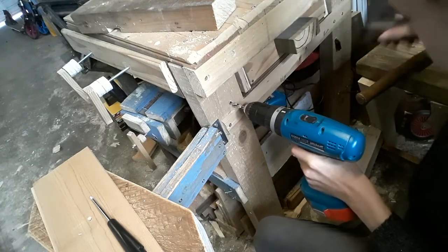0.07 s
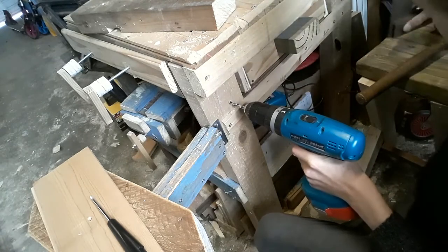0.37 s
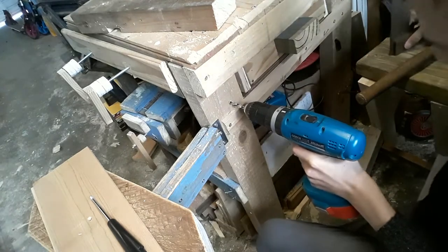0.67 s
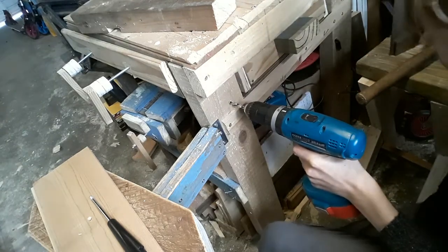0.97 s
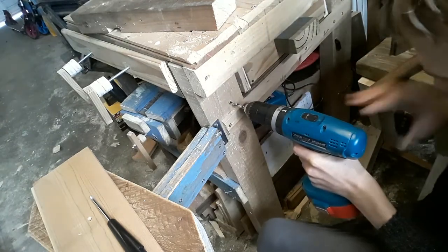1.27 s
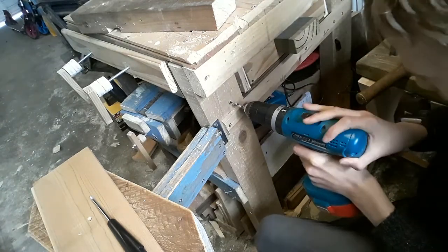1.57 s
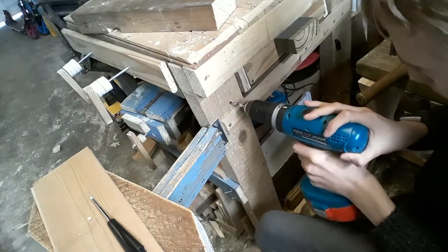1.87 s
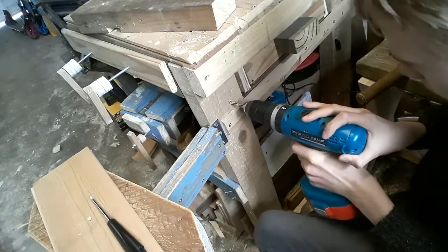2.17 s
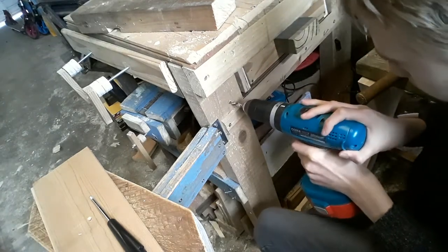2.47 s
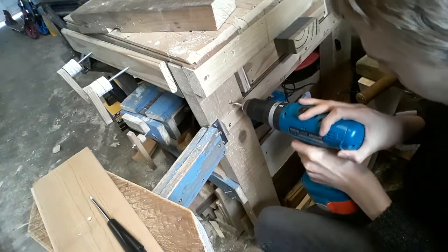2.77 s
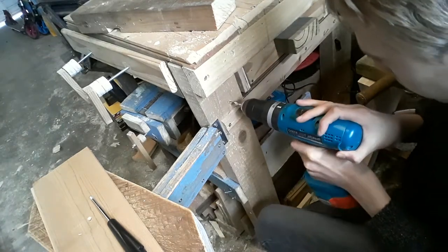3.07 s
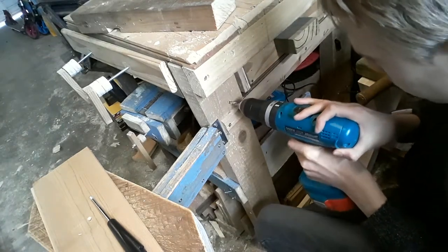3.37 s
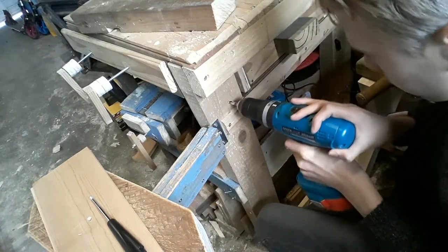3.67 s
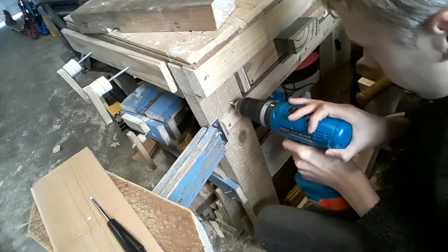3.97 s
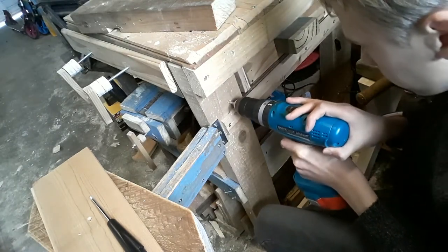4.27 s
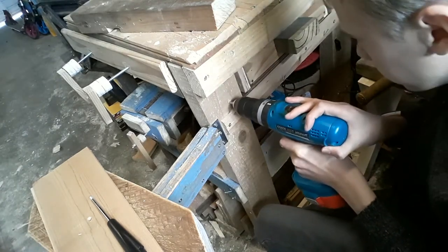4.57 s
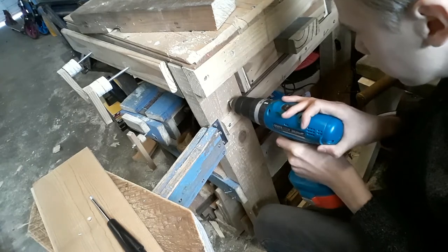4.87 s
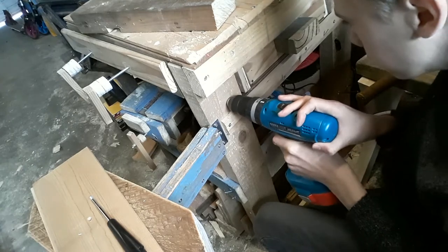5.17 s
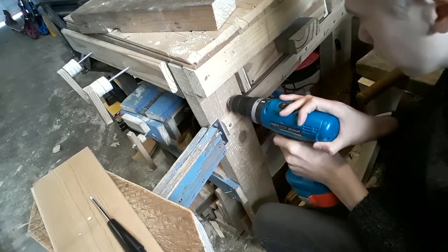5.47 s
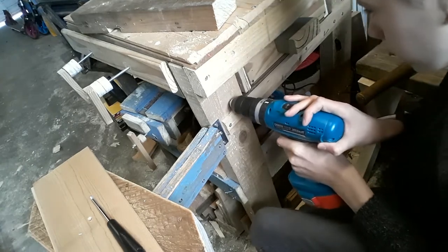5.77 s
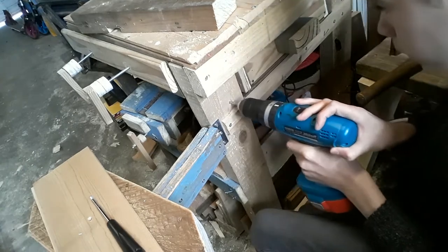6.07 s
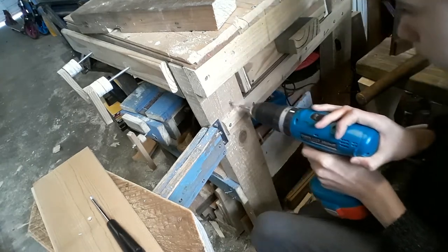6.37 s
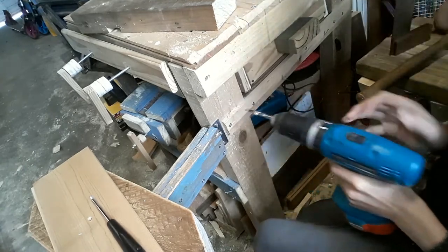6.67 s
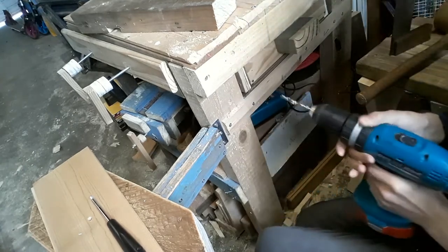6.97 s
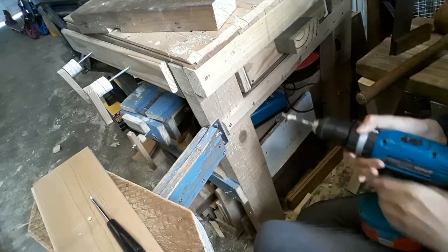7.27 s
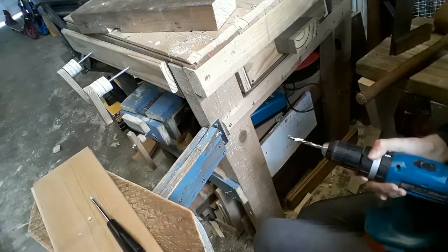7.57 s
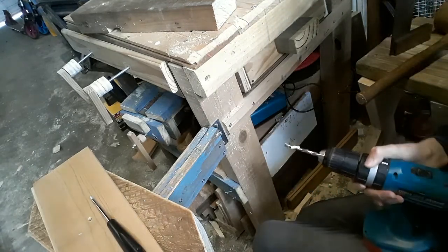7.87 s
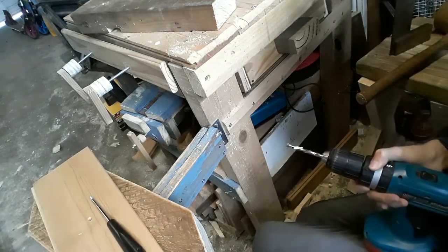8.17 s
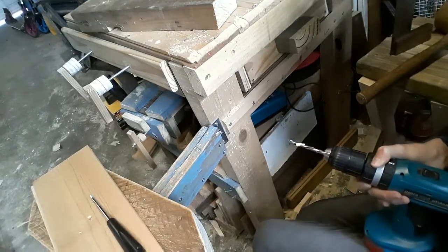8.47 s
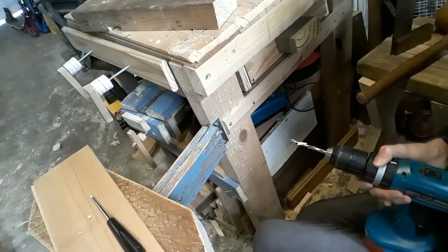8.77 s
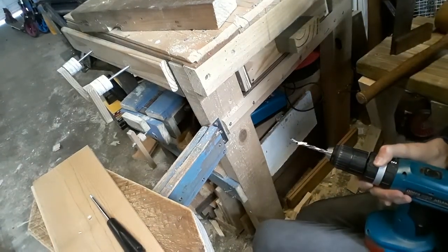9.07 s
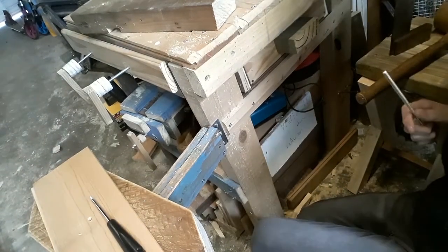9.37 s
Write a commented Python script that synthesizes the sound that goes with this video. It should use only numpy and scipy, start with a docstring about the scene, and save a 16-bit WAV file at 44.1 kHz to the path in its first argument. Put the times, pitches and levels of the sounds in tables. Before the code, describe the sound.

After a wooden knock, a cordless drill grinds into a workbench leg with a rising whine, stops, then whirs once briefly.

```python
"""A cordless drill bores into the wooden leg of a workbench in a small workshop: a slow start, a long run that
labours and then frees up, and one short burst with the bit pulled out. Motor speed drives the sound: gear teeth
rattle the housing, the rotor whines and, running free, squeals high, and the bit scrapes and splinters the
wood. Before it a piece of wood is put down and rings; hands and sleeves scuff on the tool, and a small bird
whistles outside over a faint bed of air."""
import sys
import numpy as np
from scipy import signal
from scipy.fft import rfft, irfft
from scipy.io import wavfile
from scipy.ndimage import uniform_filter1d

SR = 44100
rng = np.random.default_rng(int(sys.argv[2]) if len(sys.argv) > 2 else 0)


def generate_wav(sig):
    """Save sig (samples, or channels by samples) to the path in sys.argv[1] as 16-bit PCM at SR."""
    pcm = np.round(np.clip(np.atleast_2d(sig).T, -1, 1) * 32767).astype(np.int16)
    wavfile.write(sys.argv[1], SR, pcm)


N = 419832
TIME = np.arange(N) / SR

# motor speed through the hole; the trigger is let go at the last point: (time [s], speed [turns/s])
MOTOR_SPEED = [(1.83, 22), (1.95, 66), (2.0, 115), (2.16, 95), (2.25, 168), (2.7, 173), (2.89, 120),
               (3.02, 232), (3.2, 252), (3.45, 224), (3.85, 268), (4.14, 236), (4.28, 262), (4.38, 386),
               (4.55, 370), (4.69, 394), (4.81, 362), (5.02, 426), (5.38, 384), (5.55, 398), (5.75, 466),
               (6.05, 500), (6.4, 522), (6.545, 518)]
# how hard the drill is pushed into the wood: (time [s], gain [dB])
PUSH = [(2.05, 6), (2.35, -4.5), (3.05, -1), (3.5, 1), (3.8, 0.5), (4.82, 1.5), (4.92, -2.5), (5.4, -2.5),
        (5.58, -3.5), (5.8, 4), (6.05, 2.5), (6.4, -9)]
# EQ of the running drill and of its top-end sizzle: (frequency [Hz], gain [dB])
DRILL_EQ = [(90, -26), (150, -14.5), (200, -18), (250, -7.5), (320, -10.5), (420, -4), (600, -5), (780, -2),
            (1250, 0.5), (1600, 4), (2700, 1.5), (3400, -2.5), (4000, 1), (5200, 0), (7000, -2.5),
            (7700, -1.5), (8900, -9)]
SIZZLE_EQ = [(7800, -19.5), (8800, -12), (10000, -11), (11300, -6.5), (12700, -1), (14200, -8.5),
             (15500, -5.5)]
# resonances of the drill's housing: (frequency [Hz], width [Hz], gain [dB])
HOUSING_MODES = [(1557, 45, 1.5), (1745, 27, -5.5), (1941, 32, 6), (2110, 110, 4), (2260, 50, 1.5),
                 (2333, 50, 5.5), (2622, 97, 3), (2786, 13, 7.5), (3066, 62, -4.5), (3910, 160, -8),
                 (4730, 60, -18.5), (5890, 390, -10.5), (7550, 490, -2.5)]
# how each layer's level rides the motor speed:
# (gain at labouring speed [dB], slope below [dB/doubling], slope above [dB/doubling], added when free [dB])
BODY_RIDE = (-41, 10, 0, -8.5)
RATTLE_RIDE = (-31.5, 10, 0, -1)
CLASH_RIDE = (-33.5, 23.5, 7, -3)
SIZZLE_RIDE = (-42, 29.5, 8.5, -0.5)
SCRAPE_RIDE = (-39.5, 7, 3.5, -7.5)
WHINE_RIDE = (-1, 27.5, -1.5, -6.5)
# motor harmonics that swell as they sweep past resonances of drill and bench: (pitch [x motor speed],
# resonance [Hz], half width [Hz], gain at resonance [dB], pitch jitter [ratio], throb depth [ratio])
WHINE_PARTIALS = [(1, 280, 18, -49.5, 0.019, 0.23), (1, 372, 24, -36.5, .012, .6),
                  (4, 1120, 60, -44, .026, .3), (4, 1560, 158, -31, .01, .38),
                  (4, 1960, 70, -38.5, .008, .2), (8, 2150, 130, -36.5, .008, .2),
                  (8, 3900, 220, -36.5, .009, .2), (9, 2350, 200, -34.5, .006, .2),
                  (10, 1715, 82, -27, .009, .2), (12, 2760, 200, -36.5, .011, .2),
                  (24, 6000, 480, -46.5, .01, 0.15)]
# gear tones that come up as the motor runs free: (pitch [x motor speed], level [dB])
GEAR_TONES = [(.372, -65.5), (1.13, -58), (1.87, -47.5), (5.62, -53.5), (8.3, -43.5), (12.1, -42),
              (15.07, -44)]
# resonances of the bench leg and of the grinding bit: (frequency [Hz], width [Hz], gain [dB])
LEG_MODES = [(332, 37, -14.5), (458, 40, -6.5), (880, 104, -8.5), (1123, 84, 1), (1648, 95, -2.5)]
BIT_MODES = [(1450, 94, -5), (1710, 64, -0.5)]
# splinters tearing off as the bit enters: (time [s], half length [s], level [dB])
SPLINTERS = [(2.29, .035, -52), (2.34, 0.02, -43), (2.51, 0.045, -49), (2.72, 0.046, -53),
             (2.81, .03, -47.5), (3.103, .022, -36), (3.2, .025, -40), (3.46, .025, -39)]
# EQ of their crackle: (frequency [Hz], gain [dB])
SPLINTER_EQ = [(2000, -20), (5000, 0), (7800, -5), (10000, -2), (13000, 1), (15500, 0)]
# envelope of the high squeal as the motor runs free: (time [s], level [dB])
FREE_SQUEAL = [(6.1, -63), (6.2, -31.5), (6.29, -28), (6.52, -33.5), (6.56, -72)]
# chirp of the motor brake: (time [s], pitch [Hz], level [dB])
BRAKE_CHIRP = [(7.105, 2708, -27), (7.11, 2210, -29), (7.114, 1770, -20.5), (7.117, 2400, -20),
               (7.124, 2700, -52)]
# hits of the wood being put down; harder contact is brighter: (time [s], level [dB], low-pass [Hz])
WOOD_HITS = [(0.549, -23, 9000), (.555, -22.5, 9000), (.595, -23, 3000)]
# ring of that piece of wood: (frequency [Hz], level [dB], t60 [s])
WOOD_MODES = [(135, -16, .2), (165, -7.5, 0.27), (210, -19, 0.18), (284, -8, 0.24), (327, -11, 0.35),
              (461, -2, 0.29), (540, 0, 0.16), (588, -2, 0.25), (623, -20, .2), (735, 1, 0.12),
              (805, -21, .19), (810, -9, 0.23), (1103, 3, 0.13), (1160, -21, 0.14), (1460, -16, 0.11),
              (1620, -8, .16)]
# EQ of its thud: (frequency [Hz], gain [dB])
THUD_EQ = [(60, -37), (130, 1), (280, -3), (400, -5), (560, 5), (850, -4.5), (1100, -6), (1300, -19),
           (1570, -12), (1900, -17), (2400, -15), (4800, -29), (8000, -33.5), (15000, -54)]
# small clicks of the drill in the hand: (time [s], level [dB], decay [s])
TICKS = [(1.258, -49, 0.014), (1.511, -51.5, 0.018), (1.762, -49, .01), (8.405, -40, 0.0034)]
# hands and sleeves: (time [s], half length [s], dull rub level [dB], bright swish level [dB])
SCUFFS = [(0, 0.39, -63, -74), (1.384, 0.11, -59.5, -68), (1.69, 0.06, -58, -82), (1.771, 0.058, -57, -66),
          (7.91, .06, -70, -60), (8.283, 0.052, -69, -56.5), (8.457, 0.072, -61.5, -54.5),
          (9.06, 0.076, -75, -67.5), (9.383, 0.074, -82, -67.5), (9.483, 0.046, -57, -50)]
# EQ of tick, rub and swish: (frequency [Hz], gain [dB])
TICK_EQ = [(70, -27), (250, 6), (2000, -3), (5000, -5), (7800, 7), (10000, -4), (15000, -6)]
RUB_EQ = [(80, -12), (170, 1), (450, 8), (1000, 5), (2500, -1.5), (5000, -6), (15000, -63)]
SWISH_EQ = [(1180, -46), (2000, -47), (2680, -9), (3520, -13), (4360, -2), (4880, -4), (8080, 14),
            (9590, 0), (11800, 8.5), (15500, 3)]
# the bird's notes: (time into the song [s], length [s], start pitch [Hz], middle pitch [Hz],
# end pitch [Hz], level [dB], tremor depth [Hz])
BIRD_NOTES = [(0, .09, 6330, 5430, 5270, -68, 150), (0.187, .15, 4690, 4520, 4070, -64.5, 260),
              (0.289, 0.062, 5170, 4980, 5020, -64.5, 40), (0.421, 0.058, 4100, 4540, 3970, -57, 270),
              (0.552, 0.099, 5500, 4990, 4920, -59.5, 80), (0.769, 0.086, 4340, 4170, 3740, -55, 152),
              (0.964, 0.076, 5150, 5170, 5220, -64, 100), (1.097, 0.195, 6250, 5840, 6540, -65.5, 460),
              (1.145, .13, 5690, 5590, 5740, -64, 40), (1.322, 0.042, 4580, 4610, 4180, -57.5, 170),
              (1.425, 0.031, 4900, 4240, 4020, -59, 160), (1.603, .054, 5000, 4740, 4950, -63.5, 30),
              (1.677, .055, 5260, 5470, 5600, -63.5, 90)]
# cues for the song: (time [s], gain [dB])
SONG_CUES = [(.6, 1), (7.405, -2)]
# EQ of the outdoor murmur and the workshop hiss: (frequency [Hz], gain [dB])
MURMUR_EQ = [(15, -54), (25, -21), (75, -5.5), (108, 0), (170, -4.5), (271, -11), (398, -7), (465, -12),
             (917, -15), (1600, -24.5), (2080, -49.5), (3520, -120)]
HISS_EQ = [(1500, -7), (2100, 2), (2700, 4), (3300, -2.5), (4000, 1.5), (5000, -8.5), (6500, -14),
           (7700, -7.5), (9500, -20.5), (11500, -15.5), (13500, -9.5), (15500, -14)]
# envelope of the hiss: (time [s], level [dB])
HISS_LEVEL = [(0, -60.5), (.9, -60.5), (1.6, -61.5), (6.8, -63.5), (8.4, -63), (9.0, -69), (9.5, -63)]

LABOUR_HZ, EASING_HZ, FREE_HZ = 237, 457, 521  # motor speeds: labouring, coming free, running free
BURST_ON_S, BURST_OFF_S, BURST_HZ = 6.904, 7.119, 511  # the burst with the bit out
CRAWL_HZ = MOTOR_SPEED[0][1]
ROOM_T60_S = 0.23


def drill(brake_s=.06):
    """The motor drives gears, whine and scrape; returns the tool in the room and the dry scrape."""
    driven, released, running = motor()
    braked = np.maximum(driven * np.exp(-released / brake_s), CRAWL_HZ)
    speed = braked * (1 + .004 * drift(40))  # wavers with the changing bite of the bit
    tool = running * gearbox(speed, driven) + room(running * whine(speed), ROOM_T60_S, wet_db=-6)
    return tool, running * scrape(driven)


def motor(spin_up_hz_per_s=3400, nearer_db=5, drop_s=.023, run_out_s=.054, run_out_db=-14):
    """The trigger sets the speed asked for, the seconds since release and the drill's envelope."""
    start_s, release_s = MOTOR_SPEED[0][0], MOTOR_SPEED[-1][0]
    burst = TIME >= BURST_ON_S
    spin_up = np.clip(spin_up_hz_per_s * (TIME - BURST_ON_S), CRAWL_HZ, BURST_HZ)
    driven = np.where(burst, spin_up, curve(MOTOR_SPEED))
    released = np.maximum(TIME - np.where(burst, BURST_OFF_S, release_s), 0)
    # on release the noise drops fast, then the gears run out faintly
    stopping = np.maximum(np.exp(-released / drop_s), undb(run_out_db) * np.exp(-released / run_out_s))
    running = (TIME >= start_s) * stopping * undb(nearer_db * burst)  # held nearer for the burst
    return driven, released, running


def level_ride(speed, ride):
    """A layer's gain follows the speed, and eases back once the motor runs free or the bit is out."""
    db, below_db, above_db, free_db = ride
    doublings = np.log2(speed / LABOUR_HZ)
    speed_db = below_db * np.minimum(doublings, 0) + above_db * np.maximum(doublings, 0)
    freedom = np.maximum(np.interp(speed, [EASING_HZ, FREE_HZ], [0, 1]), TIME >= BURST_ON_S)
    return undb(db + speed_db + free_db * freedom)


def gearbox(speed, driven, cutting=.9, ring_db=-6, flutter_db=.62, surge_db=.5, push_share=.18):
    """Striking teeth and tearing fibres ring the housing; the rattle brightens with speed."""
    fibres = unit(grainy_noise(2.2, 900))
    # gears and bit reach the ear by different paths
    force = room(tooth_strikes(speed), ROOM_T60_S, wet_db=-1.5)
    force += cutting * room(fibres, ROOM_T60_S, wet_db=-1)
    force *= undb(flutter_db * drift(90) + surge_db * drift(14))
    shell = eq(force, DRILL_EQ) + undb(ring_db) * resonate(force, HOUSING_MODES)
    body = band(shell, 110, 978) * level_ride(driven, BODY_RIDE)
    rattle = band(shell, 800, 3050) * level_ride(driven, RATTLE_RIDE)
    clash = band(shell, 3130, 9100) * level_ride(driven, CLASH_RIDE)
    sizzle = band(eq(force, SIZZLE_EQ), 6350, 18800) * level_ride(driven, SIZZLE_RIDE)
    strain = undb(push_share * curve(PUSH))
    return strain * (body + rattle + clash) + sizzle


def tooth_strikes(speed, per_turn=12, cycle_teeth=64, scatter_db=4, wear=.69):
    """A click per tooth: the unevenness comes round with the planet carrier, the rest is backlash."""
    tooth = (np.cumsum(speed) / SR * per_turn).astype(int)
    flat_spectrum = np.exp(2j * np.pi * rng.random(cycle_teeth // 2 + 1))  # no one harmonic stands out
    uneven = unit(irfft(flat_spectrum))[tooth % cycle_teeth]
    backlash = unit(rng.choice([-1, 1], N) * undb(scatter_db * rng.standard_normal(N)))
    strikes = np.diff(tooth, prepend=0)
    return unit(strikes * (wear * uneven + backlash) / np.sqrt(speed))


def whine(speed, chuck_ratio=.06, rough_db=3, free_rough_db=1.5, fade_in_hz=(408, 465)):
    """Rotor hum and gear whine under load, throbbing as the chuck turns; more tones near full speed."""
    throb = tone(chuck_ratio * speed * (1 + .28 * drift(20)))
    loaded, free = np.zeros(N), np.zeros(N)
    for multiple, resonance_hz, half_width, db, jitter, depth in WHINE_PARTIALS:
        pitch = multiple * speed
        swell = undb(db) / np.hypot(1, (pitch - resonance_hz) / half_width)
        loaded += swell * tone(pitch * (1 + jitter * drift(250))) * unit(1 + depth * throb)
    loaded *= level_ride(speed, WHINE_RIDE) * fade(*np.transpose(PUSH)) * undb(rough_db * drift(70))
    for multiple, db in GEAR_TONES:
        free += tone(multiple * speed * (1 + .0035 * drift(200))) * undb(db + free_rough_db * drift(40))
    return loaded + np.interp(speed, fade_in_hz, [0, 1]) * free


def scrape(speed):
    """The cutting bit scrapes in the hole and the bench leg resonates."""
    friction = grainy_noise(2.8, 200) * undb(2 * drift(25))
    return resonate(friction, LEG_MODES) * level_ride(speed, SCRAPE_RIDE) * (TIME < BURST_ON_S)


def tip_grind(middle_s=2.46, half_length_s=.28, level_db=-39.5):
    """The tip skates on the surface before it bites and sets the bit ringing."""
    contact = np.exp(-((TIME - middle_s) / half_length_s) ** 10)
    return undb(level_db) * contact * resonate(grainy_noise(3, 170), BIT_MODES)


def splinters():
    """Each splinter is a short crackle of snapping fibres."""
    crackle = eq(grainy_noise(6, 1500), SPLINTER_EQ)
    return crackle * sum(undb(db) * np.exp(-((TIME - s) / half) ** 2) for s, half, db in SPLINTERS)


def free_squeal():
    """As the motor runs free near the end of the hole, a squeal sings in two narrow high bands."""
    lower = band(rng.standard_normal(N), 5860, 6630, order=2)
    upper = band(rng.standard_normal(N), 7550, 7850, order=2)
    return (lower + .8 * upper) * fade(*np.transpose(FREE_SQUEAL))


def brake_chirp():
    """The brake squeaks as the burst stops: a quick dip and rise in pitch."""
    s, hz, db = np.transpose(BRAKE_CHIRP)
    return tone(np.interp(TIME, s, hz)) * fade(s, db)


def wood_knocks(thud_db=-6, ring_db=-10, thud_decay_s=.012):
    """A piece of wood lands and rocks: each hit is a short thud and the ring of its modes."""
    out, t = np.zeros(N), TIME[:SR // 2]
    ring = sum((-1) ** k * undb(db) * np.sin(2 * np.pi * hz * t) * np.exp(-np.log(1000) * t / t60)
               for k, (hz, db, t60) in enumerate(WOOD_MODES))
    for s, db, cutoff_hz in WOOD_HITS:
        thud = eq(rng.standard_normal(len(t)), THUD_EQ) * np.exp(-t / thud_decay_s)
        hit = undb(thud_db) * thud + undb(ring_db) * ring / np.abs(ring).max()
        out[int(s * SR):][:len(t)] += undb(db) * signal.lfilter(*signal.butter(1, cutoff_hz, fs=SR), hit)
    low_cut = signal.butter(4, 100, "high", fs=SR, output="sos")  # a small piece radiates no deep bass
    return signal.sosfilt(low_cut, out)


def handling(tick_trim_db=-4):
    """The drill ticks crisply in the hand; skin and cloth make grainy scuffs on it."""
    crisp = undb(tick_trim_db) * eq(rng.standard_normal(N), TICK_EQ)
    out = crisp * sum(undb(db) * (TIME >= s) * np.exp(-np.abs(TIME - s) / decay) for s, db, decay in TICKS)
    friction = grainy_noise(1.5, 400)
    rub, swish = eq(friction, RUB_EQ), eq(friction, SWISH_EQ)
    for s, half, rub_db, swish_db in SCUFFS:
        span = np.abs(TIME - s) < half
        swell = np.cos(np.pi / 2 * (TIME[span] - s) / half) ** 2
        out[span] += swell * (undb(rub_db) * rub[span] + undb(swish_db) * swish[span])
    return out


def bird():
    """One song sung twice: thin gliding whistles, roughened by a fast pitch tremor, smeared by the yard."""
    out, tremor = np.zeros(N), drift(700)
    for song_s, song_db in SONG_CUES:
        for s, length, start_hz, middle_hz, end_hz, db, depth_hz in BIRD_NOTES:
            progress = np.linspace(0, 1, int(length * SR))
            first = int((song_s + s) * SR)
            span = slice(first, first + len(progress))
            hz = np.interp(progress, [0, .5, 1], [start_hz, middle_hz, end_hz]) + depth_hz * tremor[span]
            swell = np.sqrt(np.pi * np.abs(np.sin(np.pi * progress)))
            out[span] += undb(song_db + db) * swell * np.sin(2 * np.pi * np.cumsum(hz) / SR)
    return room(out, t60=.5, wet_db=2)


def air(murmur_db=-67.5):
    """The bed: a faint low murmur of outdoors and a soft hiss that slowly ebbs and swells."""
    murmur = eq(rng.standard_normal(N), MURMUR_EQ) * undb(murmur_db + .63 * drift(1.914))
    hiss = band(eq(rng.standard_normal(N), HISS_EQ), 870, 19000, order=2)
    return murmur + hiss * undb(curve(HISS_LEVEL) + .5 * drift(9.8))


def room(x, t60, wet_db):
    """Direct sound plus a dense tail of reflections, at unchanged power."""
    t = TIME[:SR]
    tail = rng.standard_normal(SR) * np.exp(-np.log(1000) * t / t60) * (t > .002)
    response = undb(wet_db) * tail / np.linalg.norm(tail)
    response[0] = 1
    return signal.fftconvolve(x, response / np.linalg.norm(response))[:N]


def undb(db):
    """Decibels to gain."""
    return 10 ** (np.asarray(db) / 20)


def unit(x):
    """Scale to rms 1."""
    return x / np.sqrt(np.mean(x ** 2))


def curve(points):
    """Automation line through (time [s], value) points."""
    return np.interp(TIME, *np.transpose(points))


def fade(s, db):
    """Gain along a level curve, silent outside it."""
    return undb(np.interp(TIME, s, db)) * (TIME >= s[0]) * (TIME <= s[-1])


def drift(rate):
    """Smooth random modulation of rms 1 that changes about rate times a second."""
    hold = int(SR / rate)
    steps = np.repeat(rng.standard_normal(N // hold + 1), hold)
    return unit(uniform_filter1d(steps, hold)[:N])


def grainy_noise(depth_db, rate):
    """White noise whose level flickers about rate times a second."""
    return rng.standard_normal(N) * undb(depth_db * drift(rate))


def tone(hz):
    """A sine of rms 1 on a moving pitch."""
    return np.sqrt(2) * np.sin(2 * np.pi * (np.cumsum(hz) / SR + rng.random()))


def eq(x, points):
    """Shape with a (frequency [Hz], gain [dB]) curve; rms 1."""
    hz, db = np.transpose(points)
    bins = np.maximum(np.fft.rfftfreq(len(x), 1 / SR), 1)
    gain = undb(np.interp(np.log(bins), np.log(hz), db))
    return unit(irfft(rfft(x) * gain, len(x)))


def band(x, lo_hz, hi_hz, order=4):
    """Band-pass; rms 1."""
    return unit(signal.sosfilt(signal.butter(order, [lo_hz, hi_hz], "band", fs=SR, output="sos"), x))


def resonate(x, modes):
    """Ring a bank of (frequency [Hz], width [Hz], gain [dB]) resonators; rms 1."""
    return unit(sum(undb(db) * signal.lfilter(*signal.iirpeak(hz, hz / width, fs=SR), x)
                    for hz, width, db in modes))


def scene():
    """The drill up front, wood and hands in the same room, bird and air behind; a mono mix."""
    tool, scraping = drill()
    boring = scraping + tip_grind() + splinters() + free_squeal()
    foley = brake_chirp() + wood_knocks() + handling()
    mono = tool + room(boring + foley, ROOM_T60_S, wet_db=-3.5) + bird() + air()
    return np.array([mono, mono])


def record(dry):
    """A steep high cut at 15750 Hz on the whole mix."""
    return signal.sosfilt(signal.ellip(12, .1, 80, 15750, fs=SR, output="sos"), dry)


dry = scene()
out = record(dry)
generate_wav(out)
```